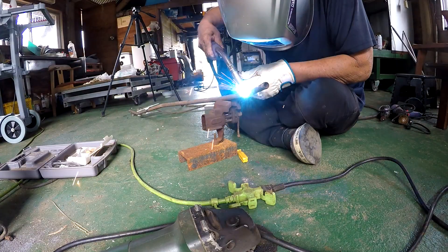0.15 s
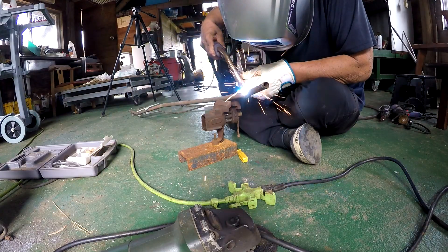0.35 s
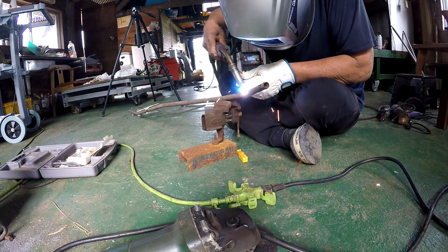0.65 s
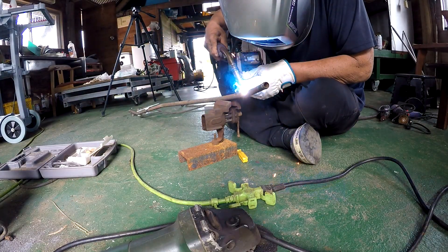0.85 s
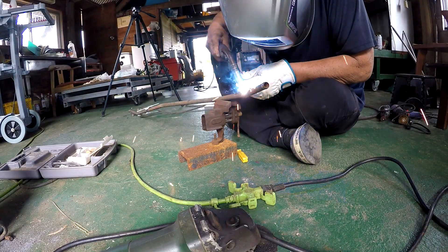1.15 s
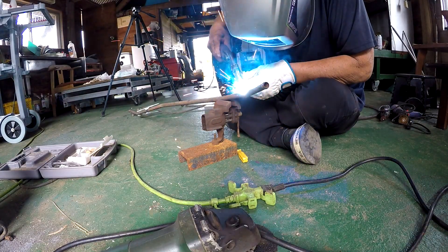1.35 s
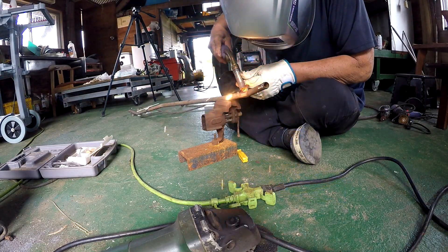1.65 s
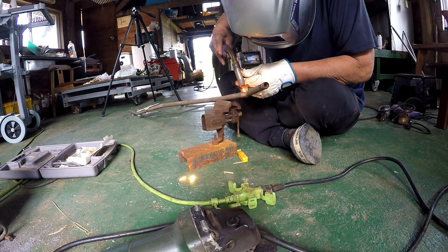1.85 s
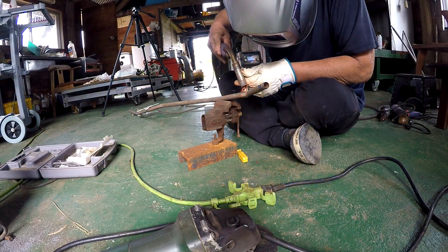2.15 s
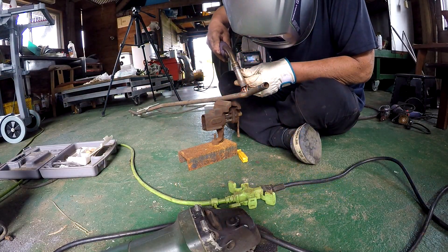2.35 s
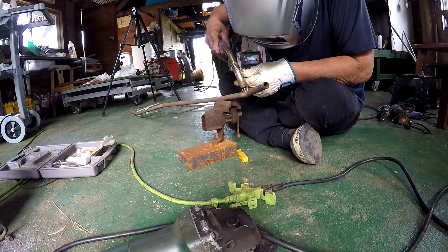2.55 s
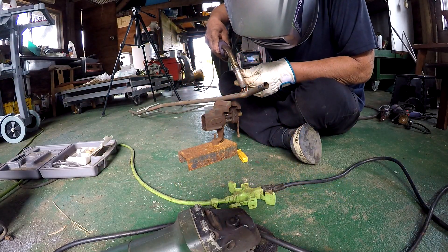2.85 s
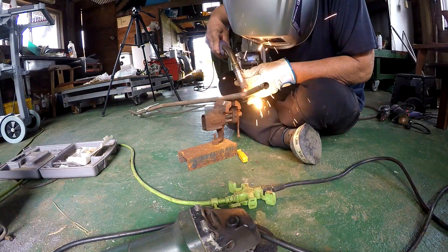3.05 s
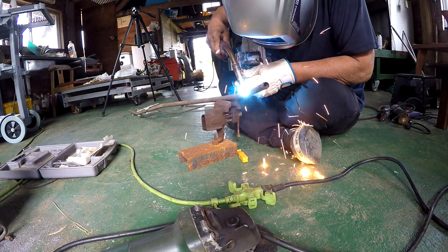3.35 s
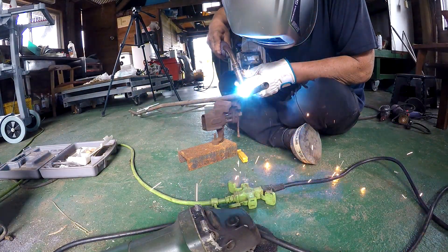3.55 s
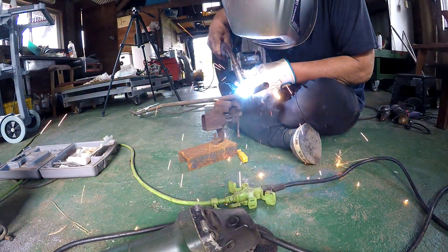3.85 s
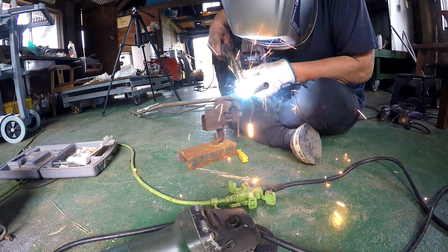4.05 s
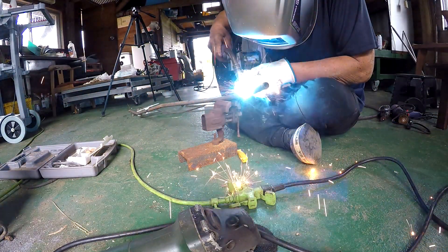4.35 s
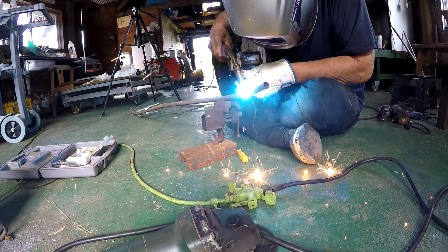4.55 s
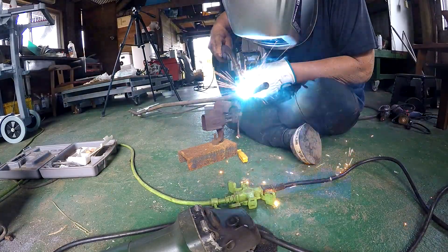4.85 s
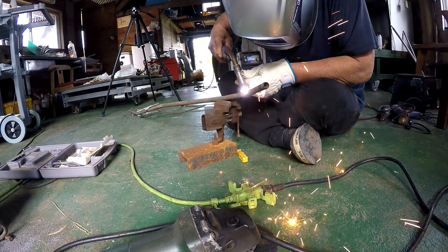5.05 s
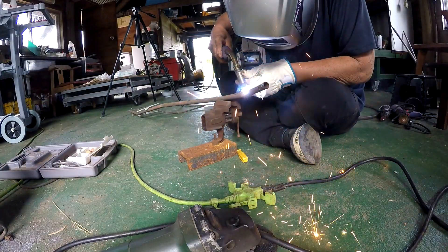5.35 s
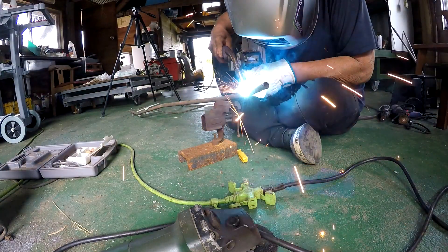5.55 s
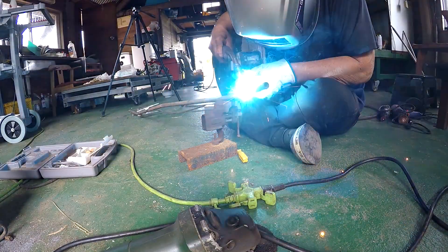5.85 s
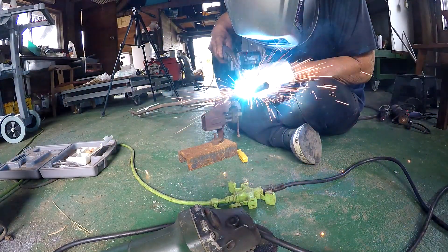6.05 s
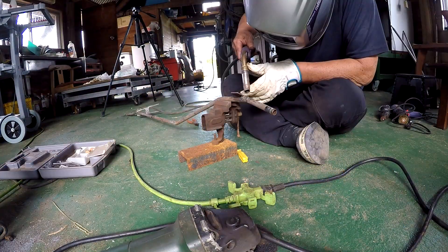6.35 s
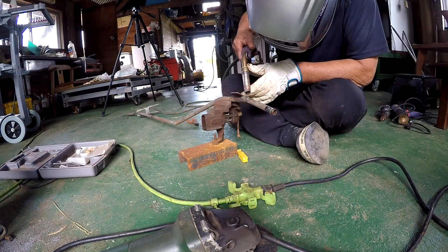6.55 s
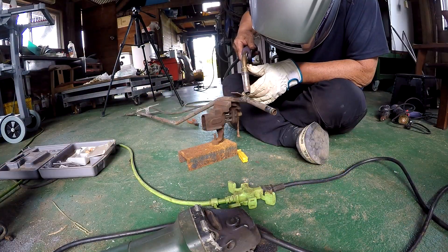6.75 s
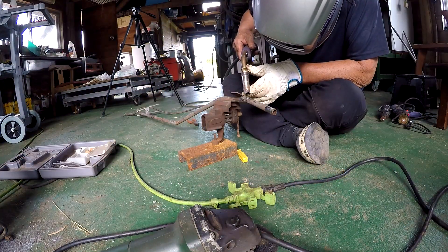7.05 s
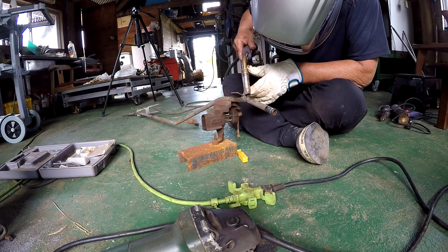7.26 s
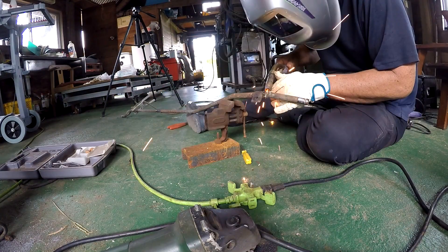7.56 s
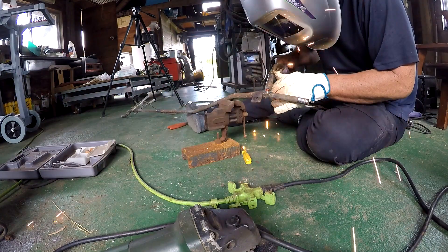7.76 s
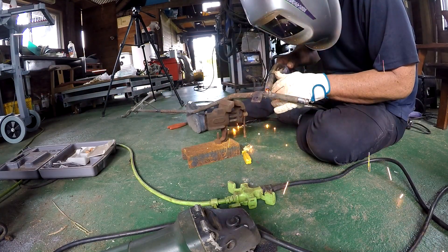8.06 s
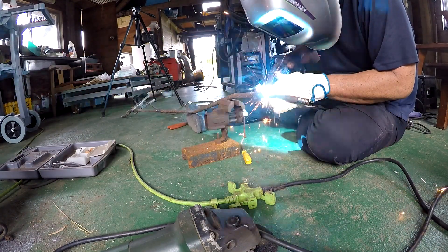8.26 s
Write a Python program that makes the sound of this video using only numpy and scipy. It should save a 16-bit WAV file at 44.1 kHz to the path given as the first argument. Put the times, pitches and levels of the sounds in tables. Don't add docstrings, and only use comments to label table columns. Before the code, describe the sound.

In a workshop, a machine fan hums a steady mid-pitched whine with airy rush. Welding arc snaps come irregularly, some alone, some in rapid buzzing crackle, each with a small thump and short room ring. A quiet gap follows, then a dull strike and denser popping with low air rumble. An abrupt cut leaves only the fan; another brings spaced, hollow cracks. Close stereo camera microphone squeezes the peaks.

```python
import sys
import numpy as np
from scipy import signal
from scipy.fft import rfft, irfft
from scipy.io import wavfile
from scipy.ndimage import uniform_filter1d

SR = 44100
rng = np.random.default_rng(int(sys.argv[2]) if len(sys.argv) > 2 else 0)


def master_out(mix):
    frames = np.transpose(np.atleast_2d(mix))
    ceiling = np.clip(frames, -1, 1)
    pcm = np.round(ceiling * 32767).astype(np.int16)
    wavfile.write(sys.argv[1], SR, pcm)


def rack_gain(trim_db):
    fader = np.asarray(trim_db, float)
    return 10 ** (fader / 20)


N = 370440

CHANGES_S = (6.2455, 7.5962)
# pitch_hz, left_minus_right_db, likeness (0-1), left_lead_rad
PORTS = [(100, -3, 1, 0.1), (200, -1, 0.98, -0.04), (398, -1.5, 0.99, 0.39), (714, -15, 0.92, 1.8),
         (815, -10.5, 0.89, 3), (1280, -1.5, 0.56, 0.92), (2550, 4, 0.3, 1.51), (2780, -2.5, 1, 0.97),
         (4000, -0.5, 0.82, -1.5), (6400, -1, 0.26, 1.5), (14800, 6.2, 0, 1)]


def on_log(table, hz, order=1):
    table = np.array(table)
    return np.interp(np.log(hz + 1), np.log(table[:, 0]), table[:, order])


def noise(spectrum, size):
    hz = np.arange(size // 2 + 1) * SR / size
    common, *own = rfft(rng.standard_normal((3, size)))
    like = np.clip(on_log(PORTS, hz, order=2), 0, 1)
    tilt = rack_gain(np.outer([.5, -.5], on_log(PORTS, hz)))
    common = common * np.exp(1j * np.outer([.5, -.5], on_log(PORTS, hz, order=3)))
    mixed = np.sqrt(like) * common + np.sqrt(1 - like) * np.array(own)
    x = irfft(rack_gain(on_log(spectrum, hz)) * tilt * mixed, size)
    return x / np.std(x.mean(0))


def walk(rate_hz):
    k = int(SR / rate_hz)
    steps = np.repeat(rng.standard_normal(N // k + 1), k)
    return 1.444 * uniform_filter1d(uniform_filter1d(steps, k), k)[:N]


def ring(modes):
    out = 0
    for hz, t60_ms, left_db, right_db, lag_ms, sign in modes:
        lead_s = on_log(PORTS, hz, order=3) / (2 * np.pi * hz) * np.array([[.5], [-.5]])
        t = np.maximum(np.arange(2048) / SR - lag_ms / 1000 + lead_s, 0)
        decay = np.exp(-np.log(1000) * 1000 * t / t60_ms)
        wave = np.sign(sign) * np.sin(2 * np.pi * hz * t) * decay
        out = out + rack_gain(np.array([[left_db], [right_db]])) * wave
    return out


def train(s, db, ragged=0.):
    x, t = np.zeros(N + 128), np.arange(128) / SR
    burst = ragged * rng.standard_normal((len(s), 128)) * np.exp(-t / .0006)
    burst[:, 0] = 1
    places = (s * SR).astype(int)[:, None] + np.arange(128)
    np.add.at(x, places, rack_gain(db)[:, None] * burst)
    return x[None, :N]


def through(x, response):
    return signal.fftconvolve(x, response, axes=1)[:, :N]


def draught(quick_db):
    # start_s, level_db
    gusts = [
        (0, -58),
        (1.5, -65),
        (1.9, -65.5),
        (3.4, -65),
        (4.05, -51),
        (4.8, -53),
        (6.1, -62),
        (6.24, -45),
        (7.6, -67),
    ]
    fan_alone_db, jolt = -72.5, 1.6
    t = np.arange(N) / SR
    rumble = noise([(15, -30), (30, -16), (65, -3.0), (100, -1.5), (130, -27.5)], N)
    middle = rumble.mean(0)
    rumble = middle + .4 * (rumble - middle)
    alone = (t > CHANGES_S[0]) & (t < CHANGES_S[1])
    level_db = np.where(alone, fan_alone_db, np.interp(t, *np.transpose(gusts)))
    return rack_gain(level_db + jolt * quick_db + 1.9 * walk(9.3)) * rumble


def fan():
    # pitch_hz, level_db (per Hz)
    air_rush = [(100, -59), (155, -15.5), (240, -14.5), (320, -22.5), (380, -19), (570, -19), (720, -21.5),
                (800, -30), (2500, -46), (4600, -54.5), (8000, -50), (9000, -59.5), (13300, -73),
                (14500, -105)]
    # pitch_hz, level_db (against the whine)
    partner_tones = [(1110, -31), (1943, -36)]
    # pitch_hz, width_hz, added_db
    casing = [(561, 55, -3.5), (883, 40, 2.5), (1980, 320, -3), (3310, 250, -4.5), (6000, 1300, -4.5),
              (6900, 550, -9.5), (8650, 150, -1)]
    whine_hz = 647.9
    turn = 2 * np.pi * np.cumsum(1 + 0.000833 * walk(3)) / SR
    wander = rack_gain(.7 * walk(14))
    port_phase = np.array([[-.23], [0]])
    whine = wander * rack_gain(np.array([[-9.2], [4.3]])) * np.sin(whine_hz * turn + port_phase)
    partners = sum(rack_gain(db) * np.sin(hz * turn) for hz, db in partner_tones)
    rush = noise(air_rush, N)
    boxed = sum(rack_gain(db) * signal.lfilter(*signal.iirpeak(hz, hz / width, SR), rush) for hz, width, db in casing)
    return np.sqrt(2) * (whine + partners) + rack_gain(-5.5 + .5 * walk(9.9)) * (rush + boxed)


def ducking(s, crack_db, thump_db):
    step_s = .002
    start_depth_db, deepest_db, push_db, creep_db_per_s = 11, 15.5, 21.5, 9
    reach, thump_weight = 0.47, .1
    dip_db, dip_release_s, dip_keenness = 8, 0.046, 3.4
    times = np.arange(0, N / SR, step_s)
    power = np.bincount((s / step_s).astype(int), rack_gain(crack_db + thump_weight * thump_db) ** 2, len(times))
    reach_db = deepest_db + reach * 10 * np.log10(power + 1e-9)
    slow, depth = np.zeros(len(times)), start_depth_db
    for i, now in enumerate(times):
        if CHANGES_S[0] < now < CHANGES_S[1]:
            depth = start_depth_db
        else:
            depth = max(depth - creep_db_per_s * step_s, 0)
            depth = slow[i] = min(depth + push_db * power[i], max(depth, reach_db[i]))
    recent = signal.lfilter([1], [1, -np.exp(-step_s / dip_release_s)], power)
    welding = (times < CHANGES_S[0]) | (times > CHANGES_S[1])
    quick = dip_db * np.tanh(dip_keenness * recent) * welding
    return (np.interp(np.arange(N) / SR, times, db) for db in (slow, quick))


def shed():
    # pitch_hz, level_db (per Hz)
    shed_colour = [(110, -2.5), (165, -0.5), (240, -7.5), (420, -9.5), (650, -10.5), (1250, -19.5),
                   (1850, -17), (2700, -22), (4050, -18), (4900, -20), (6000, -11.5), (7700, -9.5),
                   (8300, -15), (14900, -30.5)]
    # pitch_hz, t60_s
    shed_t60 = [(150, 0.38), (600, 0.63), (2500, 0.35), (7000, 0.42), (14000, 0.26)]
    size = 2 ** 15
    t, out = np.arange(size) / SR, 0
    hz = np.arange(size // 2 + 1) * SR / size
    spectrum = rfft(noise(shed_colour + [(15700, -70)], size))
    for centre in 88 * 2 ** np.arange(0, 8, .5):
        share = np.clip(1 - np.abs(2 * np.log2((hz + 1) / centre)), 0, 1)
        decay = np.exp(-np.log(1000) * t / on_log(shed_t60, centre))
        out = out + irfft(share * spectrum, size) * decay
    return out * np.clip((t - .008) / 0.00097, .35, 1)


def shed_tail(s, crack_db, share_db):
    unseen_s, unseen_db = [.001, CHANGES_S[1] - .03], [-17, -12]
    spikes = train(np.append(s, unseen_s), np.append(0.8 * crack_db, unseen_db))
    wet = through(spikes, shed())
    loudness = uniform_filter1d(np.mean(wet ** 2, axis=0), SR // 50) + rack_gain(-13.5) ** 2
    flicker_db = 1.1 * walk(40)
    return wet * rack_gain(share_db - 28.0 + flicker_db) * loudness ** -.25


def behind_welder(bright):
    # pitch_hz, width_hz, share_lost (0-1)
    hand_shadow = [(1850, 350, .35), (5750, 800, .5), (9600, 900, .4)]
    echo_share, echo_top_hz = .6, 4000
    dull = signal.sosfiltfilt(signal.butter(2, echo_top_hz, fs=SR, output="sos"), bright)
    combed = bright + echo_share * np.roll(dull, SR // 1900, axis=1)
    for hz, width, share in hand_shadow:
        combed = combed - share * signal.lfilter(*signal.iirpeak(hz, hz / width, SR), combed)
    return combed


def cracks(s, crack_db, strike, moved):
    crack_modes = [(1890, 7.7, -0.5, -3, 0.22, 1), (2330, 10.2, -15, -16, 0.21, 1),
                   (3430, 3.15, -3, 1.5, 0.069, -1), (3907, 4.4, -6.5, 1, 0.027, -1)]
    sizzle_modes = [(5910, 4, 0, 5, 0.032, 1), (7206, 16.4, 0.5, -3, 0.029, -1),
                    (9630, 4.4, -5, -2, 0.037, 1), (12520, 1.8, -5, -6, 0.057, -1),
                    (14860, 2.6, -5.5, -13, 0.037, 1),
                    (8530, 4, -7, -10, 0.034, -1), (13700, 2.3, -8, -13, .03, 1)]
    other_side_modes = [(2450, 6.1, -4, -2, 0.19, 1), (3270, 3.5, -7, -9, .05, -1),
                        (6500, 5.3, -13, -10, .03, 1)]
    ragged, strike_dull_db = .05, 5
    bounce, bounce_other_side = 0.47, .3
    crack = through(train(s, crack_db - 6.0, ragged), ring(crack_modes))
    sizzle_db = crack_db - 8 - strike_dull_db * strike
    crack += through(train(s, sizzle_db, 4 * ragged), ring(sizzle_modes))
    crack += through(train(s[moved], crack_db[moved] - 10.0, ragged), ring(other_side_modes))
    floor_share = np.where(np.arange(N) / SR > CHANGES_S[1], bounce_other_side, bounce)
    return crack + floor_share * np.roll(crack, SR // 2000, axis=1)


def thumps(s, thump_db, strike):
    # pitch_hz, t60_ms, left_db, right_db, lag_ms, sign (1 or -1)
    thump_modes = [(206, 24, -2, -1.5, 0.91, 1), (544, 11.7, 1.5, 2.5, 0.33, -1),
                   (775, 4.65, 1.5, -8, 0.63, 1)]
    boom_mode = [(201, 42, -1, 1.5, 1.45, 1)]
    thump = through(train(s, thump_db - 1.5), ring(thump_modes))
    return thump + through(train(s[strike], thump_db[strike] - 10.5), ring(boom_mode))


def shorts():
    # start_s, crack_db (peak), thump_minus_crack_db.
    tack_pops = [(0.0714, -8.5, -3), (0.1775, -14, -1.5), (0.364, -4.5, -3), (0.4227, -15, 1),
                 (0.5596, -12.5, 5), (0.7305, -13.5, .5), (0.8154, -13.5, -.5), (1.2961, -8, -2),
                 (1.3205, -15, 1.5), (1.3295, -13.5, -2.5), (1.3463, -10.5, -3), (1.57, -13.5, -2),
                 (1.6196, -14.5, 0), (2.9903, -13.5, 10)]
    seam_pops = [(3.1471, -11, -2), (3.1616, -13, 3.5), (3.1911, -19, 0), (3.2012, -8.5, 2.5),
                 (3.3346, -5, -.5), (3.4662, -15, 3), (3.4934, -11, 2.5), (3.901, -8, .5),
                 (4.0028, -11.5, 3), (4.0987, -10.5, 1.5), (4.2, -13.5, 1.5), (4.358, -13, 0),
                 (4.4531, -13.5, 1), (4.5986, -10, 1.5), (4.879, -10.5, -.5),
                 (5.0097, -8.5, -1), (5.1805, -9, 0), (5.2463, -11.5, .5), (5.4247, -6, -1.5),
                     (5.5455, -11.5, 2), (5.5949, -12.5, .5), (5.6497, -13.5, 0), (5.6989, -12, .5),
                     (5.719, -18, 1.5), (5.8893, -9, -1.5), (6.0002, -12, 1), (6.0146, -15, 2),
                     (6.0796, -6.5, -.5), (6.1906, -11.5, -3.5)]
    other_side_pops = [
        (7.6803, -7, 0.77),
        (7.8267, -7.5, -.5),
        (7.9814, -6.5, -0.25),
        (8.1174, -18.5, 1.8),
        (8.2027, -15, 0.8),
        (8.2905, -6.5, -.5),
    ]
    # first_s, last_s, gap_ms, crack_db (peak), thump_minus_crack_db
    melt_runs = [(0.44, 0.4696, 7.2, -18, 2), (0.479, 0.6158, 8.6, -16.5, -0.5),
                 (0.905, 0.925, 9.7, -12.5, 0), (0.9426, 1.0152, 7.2, -17, 2.5),
                 (1.025, 1.0624, 9.2, -16, 0), (1.0839, 1.128, 22, -14.5, 0.5),
                 (1.3694, 1.416, 23, -15, -1.8), (2.9917, 3.002, 3.9, -16.5, -6),
                 (3.2226, 3.248, 25, -21.5, 1), (3.6021, 3.6638, 8.8, -13, 3),
                 (3.747, 3.7752, 9.4, -14, 1.2), (4.0388, 4.0526, 6.7, -17, 3.5),
                 (4.2354, 4.2401, 5.3, -18, 4), (4.3873, 4.4029, 7.8, -13.5, 1),
                 (4.4219, 4.4412, 19, -15, 2.5), (4.819, 4.8364, 19, -16.5, 4.5),
                 (4.8957, 4.919, 8, -15, 3), (5.263, 5.277, 6.8, -12, 2), (5.6102, 5.6354, 12, -16.5, 2),
                 (6.11, 6.141, 15, -17, 1.5), (6.1972, 6.24, 14, -14.5, 2.5)]
    jitter, lead_db, scatter_db, thump_steadiness = .1, 1.5, 2.2, .8
    spatter_db = -7
    rows = [np.array(tack_pops + seam_pops + other_side_pops)]
    chances = rng.standard_normal((len(melt_runs), 4, 32))
    for (first, last, gap_ms, crack_db, thump_db), chance in zip(melt_runs, chances):
        s = np.linspace(first, last, 1 + round(1000 * (last - first) / gap_ms))
        late, size, weight, spot = chance[:, :len(s)]
        s[1:-1] += jitter * gap_ms / 1000 * late[1:-1]
        stray_db = np.append(lead_db, scatter_db * size[1:])
        rows.append(np.c_[s, crack_db + stray_db, thump_db - thump_steadiness * stray_db + weight])
        tick_s = first + (last - first) * (np.abs(7 * spot) % 1)
        ticks = np.c_[tick_s, crack_db + spatter_db + 3 * late, weight - 4]
        rows.append(ticks[1::2])
    return np.vstack(rows).T


def arc(s, crack_db, thump_db):
    t = np.arange(N) / SR
    strike, moved = (s > 2.98) & (s < 3.01), s > CHANGES_S[1]
    bright = cracks(s, crack_db, strike, moved) + shed_tail(s, crack_db, share_db=1.28)
    bright = np.where(t > CHANGES_S[1], behind_welder(bright), bright)
    welding = (t < CHANGES_S[0]) | (t > CHANGES_S[1])
    return (bright + thumps(s, crack_db + thump_db, strike)) * welding


def scene():
    pops = shorts()
    slow_db, quick_db = ducking(*pops)
    whine_db = -26.5
    shop = rack_gain(whine_db - slow_db - quick_db) * fan() + arc(*pops)
    wind_filter = signal.butter(5, 122, "high", fs=SR, output="sos")
    return signal.sosfiltfilt(wind_filter, shop) + draught(quick_db)


def band_limit(x):
    return signal.sosfilt(signal.butter(12, 16650, fs=SR, output="sos"), x)


def record(dry):
    limited = np.tanh(2.1 * dry) / 2
    top = signal.ellip(6, .5, 50, 16200, fs=SR, output="sos")
    return band_limit(signal.sosfilt(top, limited))


dry = scene()
out = record(dry)
master_out(out)
```